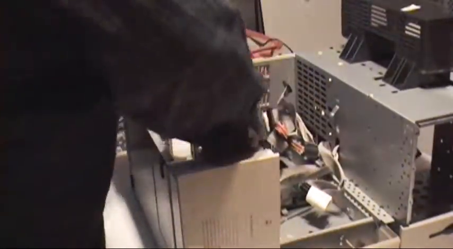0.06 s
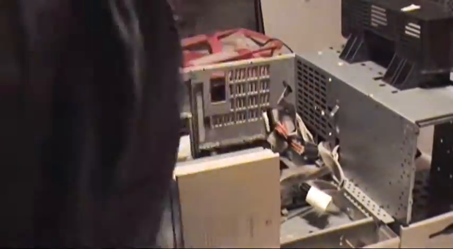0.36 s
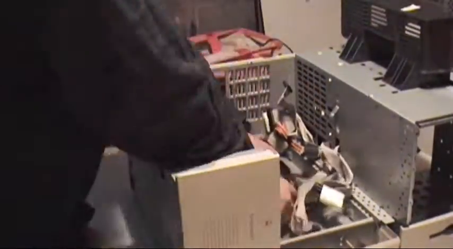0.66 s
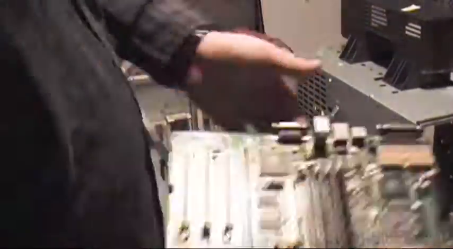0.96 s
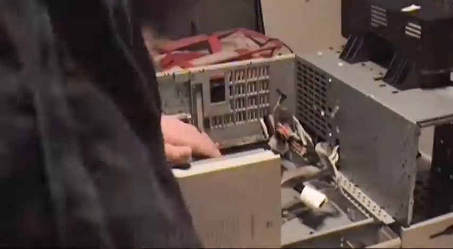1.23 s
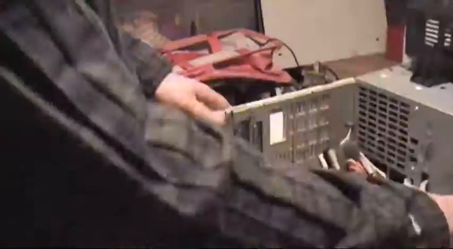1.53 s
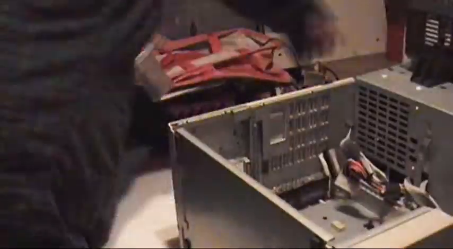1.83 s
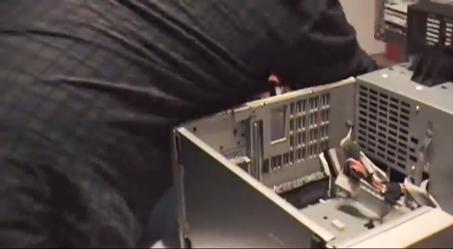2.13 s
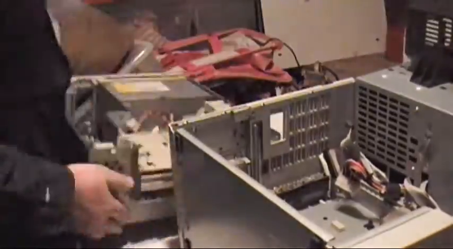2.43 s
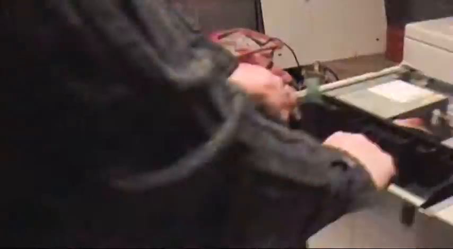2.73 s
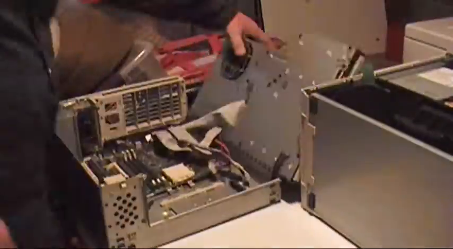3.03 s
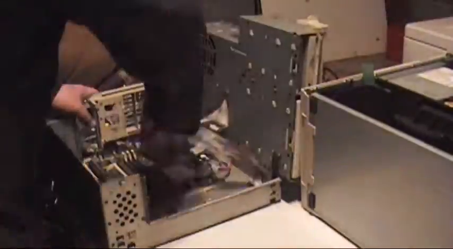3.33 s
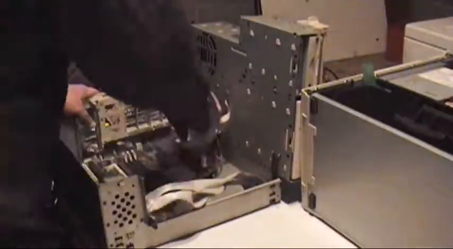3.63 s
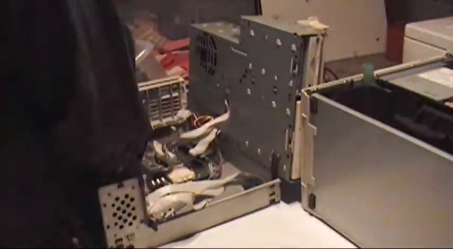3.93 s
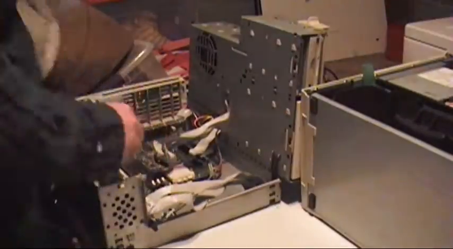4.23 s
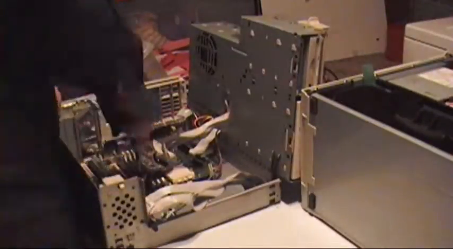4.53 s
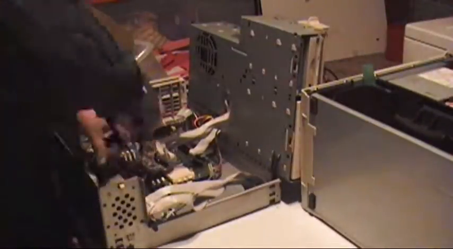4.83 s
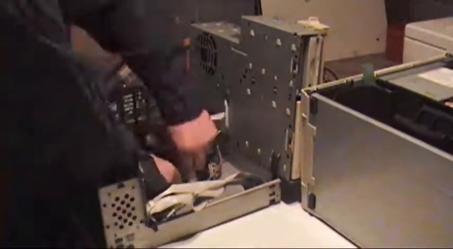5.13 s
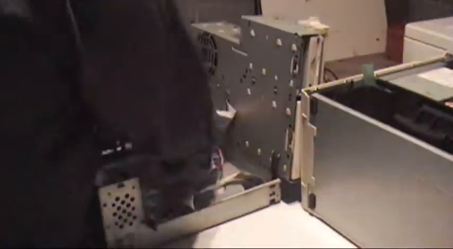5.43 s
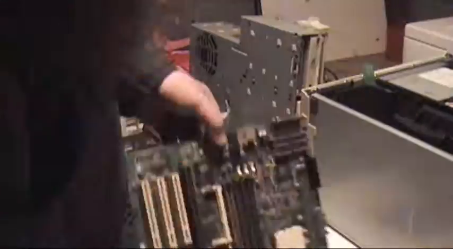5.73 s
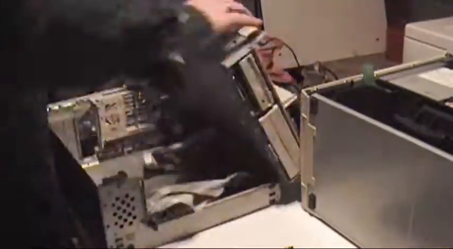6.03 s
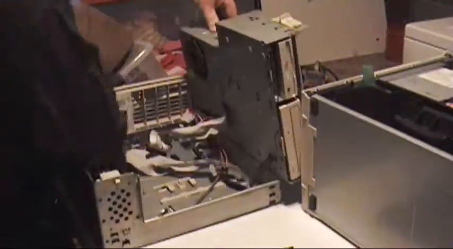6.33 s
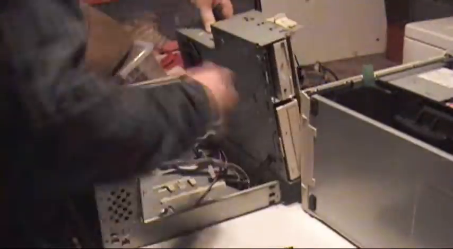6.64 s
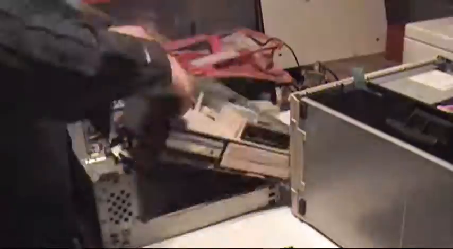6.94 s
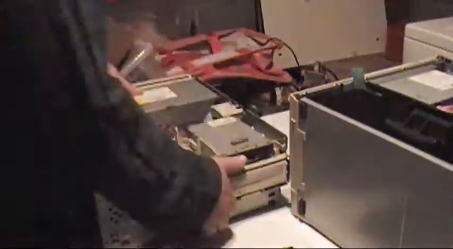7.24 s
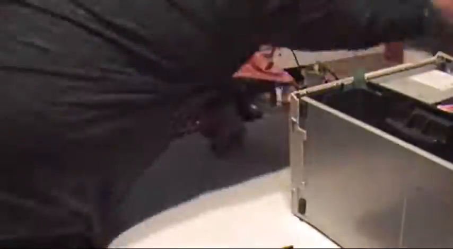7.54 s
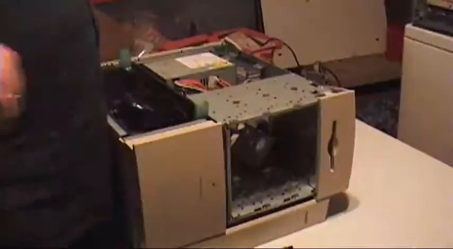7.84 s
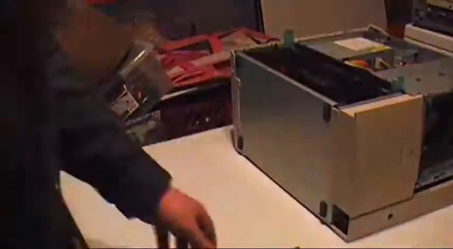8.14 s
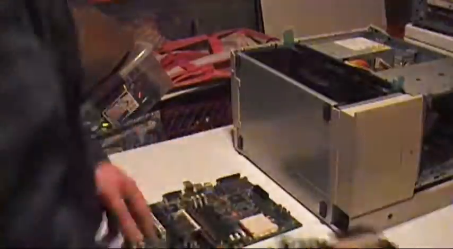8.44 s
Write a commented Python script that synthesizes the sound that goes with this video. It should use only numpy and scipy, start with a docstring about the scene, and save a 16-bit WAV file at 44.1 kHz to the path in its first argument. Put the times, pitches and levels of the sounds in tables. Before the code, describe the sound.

Fast-motion handling of thin metal parts in a small room, heard from directly in front. Sharp, irregular clicks and rattles run over crackling cable and sleeve rustle and light table knocks. Early on the steel computer case squeaks and scrapes, then its panel rings. Screws jingle softly, another squeak follows, and near the end come harder hits and a loud short scrape. A faint steady whine and hiss lie underneath.

```python
"""Taking a steel computer case apart

Sped-up (time-lapse) sound of work on a table in a small room; every sound is short and high. Screws,
clips and brackets click, parts slide and knock on the table. Shoved about, the case squeaks; blows ring
its side panel. Sleeves and cables rustle and loose screws jingle over room hiss and a faint whine."""
import sys
import numpy as np
from scipy import signal
from scipy.fft import rfft, irfft, next_fast_len
from scipy.io import wavfile
from scipy.ndimage import uniform_filter1d

SR = 44100
rng = np.random.default_rng(int(sys.argv[2]) if len(sys.argv) > 2 else 0)


def transcribe(signal):
    """Save signal, clipped to [-1, 1], as a 16-bit WAV file at the path in sys.argv[1]."""
    frames = np.atleast_2d(signal).T
    limited = np.clip(frames, -1, 1)
    pcm = np.round(limited * 32767).astype(np.int16)
    wavfile.write(sys.argv[1], SR, pcm)


N = 382347
TIME = np.arange(N) / SR
TOP_HZ = 15900

# metal contact spectrum: f/Hz, level/dB
CONTACT_SPECTRUM = [(120, -29.5), (400, -23.5), (800, -21), (1400, -10), (2400, -3), (3200, -4.5),
                    (5000, -0.5), (9000, 0), (15500, -5.5)]
# sleeve and cable spectrum: f/Hz, level/dB
RUSTLE_SPECTRUM = [(600, -16), (2300, 7), (3400, 0.5), (5500, 4), (10000, 3.5), (15500, -2.5)]


def undb(db):
    """Decibels to gain."""
    return 10 ** (np.asarray(db) / 20)


def rms(x):
    """Root mean square."""
    return np.sqrt(np.mean(x ** 2))


def unit(x):
    """Scale to rms 1."""
    return x / rms(x)


def fade(t, t60_s):
    """Free decay, 60 dB in t60_s."""
    return np.exp(-np.log(1000) * t / max(t60_s, 1e-3))


def arch(u):
    """Smooth swell: 1 at u = 0, zero beyond -1 and 1."""
    return np.cos(np.pi / 2 * np.clip(u, -1, 1)) ** 2


def walk(rate_hz):
    """Smooth random curve, rms 1."""
    step = int(SR / rate_hz)
    return unit(uniform_filter1d(np.repeat(rng.standard_normal(N // step + 1), step), step)[:N])


def add(track, start_s, x):
    """Mix x into the track."""
    i = max(int(start_s * SR), 0)
    track[i:i + len(x)] += x[:max(N - i, 0)]


def pan(x, left_db):
    """Mono to stereo, the left louder by left_db."""
    gains = undb(np.array([[left_db], [-left_db]]) / 2)
    return x * gains / gains.mean()


def colour(x, spectrum, tilt_db_oct=0):
    """Minimum-phase filter through (f/Hz, level/dB) points, tilted above 1400 Hz."""
    n = 2 * next_fast_len(len(x) // 2 + 1)
    hz, db = np.transpose(spectrum)
    tilted_db = db + tilt_db_oct * np.log2(np.maximum(hz / 1400, 1))
    bin_hz = np.arange(n // 2 + 1) * SR / n
    gain = undb(np.interp(np.log(bin_hz + 1), np.log(hz), tilted_db))
    cepstrum = irfft(np.log(gain))
    cepstrum[1:n // 2] *= 2
    cepstrum[n // 2 + 1:] = 0
    return irfft(rfft(x, n) * np.exp(rfft(cepstrum)))[:len(x)]


def resonate(x, hz, width_hz):
    """One resonance, gain 1 at its centre."""
    return signal.lfilter(*signal.iirpeak(hz, hz / width_hz, fs=SR), x)


def reflect(x, lag_s, gain):
    """A bounce off a nearby sheet ripples the spectrum; the lag may move."""
    i = np.arange(len(x))
    return x + gain * np.interp(i - lag_s * SR, i, x, left=0)


def room(x, tail_t60_s=0.056, tail_db=-22, early_t60_s=0.006, early_db=-17, size=5000):
    """A very short tail, and near reflections that differ between the sides."""
    # left-right difference of the reflections: f/Hz, level/dB
    spread = [(100, 9), (1000, -7), (3000, -25), (6000, -3.5), (12000, 4)]
    t = np.arange(size) / SR
    mid = np.atleast_2d(x).mean(axis=0)
    tail_noise, early_noise = rng.standard_normal((2, size)) * (t > 0.001) / np.sqrt(size)
    tail_ir = tail_noise * unit(fade(t, tail_t60_s))
    early_ir = colour(unit(early_noise * fade(t, early_t60_s)) / np.sqrt(size), spread)
    tail = undb(tail_db) * signal.oaconvolve(mid, tail_ir)[:N]
    early = undb(early_db) * signal.oaconvolve(mid, early_ir)[:N]
    return x + tail + early * np.array([[1], [-1]])


def air(shared_db=-63, own_db=-54):
    """Room noise common to both sides, plus a brighter hiss on each."""
    # room noise before tilt: f/Hz, level/dB
    spectrum = [(30, -22), (100, -20.5), (200, -17), (310, -8.5), (520, -11), (900, 0), (1500, -3),
                (2300, 2.5), (3200, 1), (6000, 0), (15500, -7)]
    shared = unit(colour(rng.standard_normal(N), spectrum, tilt_db_oct=-4.5))
    own = np.array([unit(colour(rng.standard_normal(N), spectrum, tilt_db_oct=2.2)) for _ in range(2)])
    return undb(shared_db) * shared + undb(own_db) * own


def whine(waver=0.001024, flutter_db=2):
    """Mains-powered gear: steady lines that waver a little."""
    # sine lines: f/Hz, rms level/dB
    lines = [(909.5, -64.5), (1856, -58), (2184, -67.5), (3711, -66.5)]
    out = np.zeros(N)
    wavering_s = np.cumsum(1 + waver * walk(25)) / SR
    for hz, db in lines:
        flutter = (walk(14) + walk(2.02)) / np.sqrt(2)
        out += undb(db + flutter_db * flutter) * np.sin(2 * np.pi * hz * wavering_s)
    return np.sqrt(2) * out


def whistle():
    """A faint far whistle swells and fades as it glides down."""
    # glides: start/s, length/s, from/Hz, to/Hz, top rms level/dB
    glides = [(.48, 0.11, 1345, 1296, -59), (0.976, 0.22, 1450, 1285, -65)]
    out = np.zeros(N)
    for start_s, length_s, from_hz, to_hz, db in glides:
        u = np.linspace(-1, 1, int(length_s * SR))
        cycles = np.cumsum(np.linspace(from_hz, to_hz, len(u))) / SR
        add(out, start_s, undb(db) * arch(u) * np.sin(2 * np.pi * cycles))
    return np.sqrt(2) * out


def jingles(patter_db=8, hiss_db=-4):
    """Loose screws tap each other in a dense patter and ring in a few high modes."""
    # shakes: centre/s, length/s, level/dB
    shakes = [(4.46, 0.55, -53.5), (4.744, 0.55, -48), (5.333, 1, -53)]
    # screw modes: f/Hz, width/Hz, level/dB
    modes = [(4840, 380, -2.5), (8400, 620, -2), (10800, 550, 2), (11750, 350, 4), (13000, 400, -6),
             (14000, 300, -2)]
    shake = sum(undb(db) * arch(2 * (TIME - at_s) / length_s) for at_s, length_s, db in shakes)
    taps = rng.standard_normal(N) * undb(patter_db * walk(360))
    ring = unit(sum(undb(db) * resonate(taps, hz, width_hz) for hz, width_hz, db in modes))
    return shake * (ring + undb(hiss_db) * unit(colour(taps, RUSTLE_SPECTRUM)))


def rustle(tick_t60_s=0.0094, tick_db=-2, cloth_db=-8, patchy_db=4.5, idle_db=-63,
           bounce=0.67, ticks=1900):
    """Cables and sleeves crackle and rub near the steel sheets; between reaches they almost rest."""
    # reaches of an arm: centre/s, length/s, level/dB
    reaches = [(0.032, 0.3, -41.5), (0.736, 0.2, -42), (1.228, 0.19, -45), (1.565, 0.078, -45),
               (1.915, 0.093, -42), (2.147, 0.17, -34.5), (2.368, 0.11, -36), (2.6, 0.52, -45.5),
               (2.858, 0.15, -42), (3.304, 0.11, -41), (3.425, 0.2, -44.5), (3.825, 0.74, -48.5),
               (4.46, 0.26, -46), (5.216, 0.2, -51), (5.66, 0.43, -61), (5.77, 0.35, -46),
               (6.106, 0.43, -43.5), (6.424, 0.23, -47), (6.58, 0.1, -46), (6.889, 0.13, -39),
               (7.051, 0.17, -40.5), (7.242, 0.13, -45.5), (7.46, 0.35, -39.5), (8.131, 0.1, -44),
               (8.356, 0.086, -43), (8.5, 0.13, -42.5), (8.644, 0.11, -46)]
    power = sum(undb(db) ** 2 * arch(2 * (TIME - at_s) / length_s) for at_s, length_s, db in reaches)
    motion = np.sqrt(power)
    energy = np.zeros(N)
    energy[rng.integers(N, size=ticks)] = undb(-5.5 * np.log(rng.random(ticks) + 0.02)) ** 2
    energy = np.abs(signal.oaconvolve(energy, fade(TIME[:2000], tick_t60_s) ** 2)[:N])
    crackle = unit(colour(rng.standard_normal(N) * np.sqrt(energy), RUSTLE_SPECTRUM))
    cloth = unit(colour(rng.standard_normal(N), RUSTLE_SPECTRUM) * undb(patchy_db * walk(50)))
    direct = undb(tick_db) * crackle * motion + cloth * np.hypot(undb(cloth_db) * motion, undb(idle_db))
    lag_s = 0.000581 * (1 + 0.205 * walk(20))
    return reflect(direct, lag_s, bounce) / np.hypot(1, bounce)


def table_knocks(mid_t60_s=0.02, push=9.9, mid_hz=260, ring_db=-4, size=4000, onset_samples=220):
    """A push and a dry shudder of the table top; each spot has its own pitch, damping and hardness."""
    # weight landing: t/s, onset level/dB
    landings = [(.272, -38), (0.281, -36.5), (.343, -34.5), (.677, -33.5), (.755, -38.5), (0.859, -42),
                (1.21, -33.5), (1.388, -36.5), (1.747, -34.5), (2.594, -39.5), (2.657, -36.5),
                (2.895, -35.5), (2.948, -34.5), (3.235, -40), (3.295, -36), (3.442, -35), (3.595, -36),
                (3.833, -38.5), (4.129, -36), (4.531, -38.5), (4.943, -35.5), (5.206, -37), (5.574, -37),
                (5.75, -34), (5.916, -36), (6.063, -36), (6.763, -36.5), (6.851, -38.5), (6.998, -36.5),
                (7.028, -36.5), (7.064, -38.5), (7.128, -38.5), (7.145, -36.5), (7.404, -38),
                (7.442, -45.5), (7.523, -38.5), (7.952, -39.5), (8.556, -47.5)]
    # table top response: f/Hz, level/dB
    spectrum = [(25, -21), (100, -2.5), (250, -0.5), (500, -4.5), (1200, -6), (4000, -6.5), (14000, -12)]
    out, t = np.zeros(N), np.arange(size) / SR
    spots = rng.uniform(-1, 1, (len(landings), 3))
    for (at_s, db), (pitch, damping, hardness) in zip(landings, spots):
        shudder = rng.standard_normal(size) * fade(t, mid_t60_s * 2 ** (damping / 2))
        force = colour(shudder, [(120, -10), (500, 0)])
        force[0] += push
        hz = mid_hz * 2 ** pitch
        knock = colour(force + undb(ring_db) * resonate(force, hz, hz / 2), spectrum, 2 * hardness - 1)
        add(out, at_s, knock * undb(db) / rms(knock[:onset_samples]))
    return out


def side_panel(ring_db=-10, rattle_db=3, wander=0.012, buzz_db=4, buzz_t60_s=0.19, size=30000):
    """The struck panel rings in its low modes; loose edges buzz and shake their pitch and level."""
    # blows: t/s, level/dB, tilt/(dB/oct)
    blows = [(1.957, -42.5, -0.5), (2.086, -43.5, 3), (2.176, -35.5, -2), (7.389, -39.5, 10),
             (7.406, -37, 1.5), (7.52, -34, 3)]
    # panel modes: f/Hz, level/dB, t60/s
    modes = [(344, -11, 0.2), (495, -1.5, 0.23), (844, -8, 0.44), (992, -3, 0.28), (1200, 0.5, 0.31),
             (1326, 0, 0.74), (1462, 3, 0.17), (1750, -3, 0.22), (2030, 1.5, 0.21)]
    buzz_spectrum = [(150, -26), (350, -24), (950, 6.5), (1400, -1)]  # f/Hz, level/dB
    out, t = np.zeros(N), np.arange(size) / SR
    for at_s, db, tilt in blows:
        ring = np.zeros(size)
        for hz, mode_db, t60_s in modes:
            cycles = hz * np.cumsum(1 + wander * walk(245)[:size]) / SR + rng.random()
            gain = undb(mode_db + tilt * np.log2(hz / 1000) + rattle_db * walk(105)[:size])
            ring += gain * np.sin(2 * np.pi * cycles) * fade(t, t60_s)
        buzz = unit(colour(rng.standard_normal(size), buzz_spectrum)) * fade(t, buzz_t60_s)
        add(out, at_s, undb(db) * (undb(ring_db) * ring + undb(buzz_db) * buzz))
    return out


def scrapes(grit_db=3, ring_db=-7, width_hz=1000, rise_db=20, fall_db=25, trim_db=-1):
    """Dense tiny slips shake a sliding part; the push swells, then lets go."""
    # slides: peak/s, rise/s, fall/s, level/dB, ring/Hz, tilt/(dB/oct)
    slides = [(1.01, 0.13, 0.12, -44.5, 6000, 0.5), (1.284, 0.026, 0.022, -26.5, 8040, 0),
              (1.311, 0.0051, 0.0058, -28, 2430, -1), (1.454, 0.022, 0.053, -25.5, 6300, -2),
              (1.645, 0.012, 0.084, -25, 10750, 0), (2.25, 0.01, 0.037, -38.5, 3700, -5.5),
              (2.705, 0.017, 0.059, -22.5, 2580, -1), (6.738, 0.018, 0.025, -32.5, 7300, 1),
              (6.817, 0.0053, 0.026, -36, 3050, -2.5), (6.844, 0.0081, 0.021, -20, 5270, 3),
              (7.698, 0.036, 0.099, -28.5, 5830, -1), (7.956, 0.024, 0.038, -15, 5500, -1),
              (8.001, 0.0073, .008, -35, 2040, -6)]
    out = np.zeros(N)
    for peak_s, rise_s, fall_s, db, hz, tilt in slides:
        t = np.arange(peak_s - rise_s, peak_s + fall_s, 1 / SR)
        slips = rng.standard_normal(N)[:len(t)]
        slips *= undb(grit_db * np.repeat(rng.standard_normal(N // 20), 20)[:len(t)])
        lag_s = 0.000935 * (1 + 0.13 * walk(31.7)[:len(t)])  # the gap to the sheet changes
        slips = reflect(slips, lag_s, gain=0.28)
        ring = resonate(resonate(slips, hz, 2 * width_hz), hz, width_hz)
        body = unit(colour(slips, CONTACT_SPECTRUM, tilt)) + undb(ring_db) * unit(ring)
        drop_db = np.where(t < peak_s, rise_db / rise_s ** 2, fall_db / fall_s ** 2) * (t - peak_s) ** 2
        add(out, t[0], unit(body) * undb(db + trim_db - drop_db))
    return out


def squeaks(jitter=0.06, octave_db=14, flutter_db=4, rasp_db=-3, braking_hz_per_s=350000, harmonics=7):
    """A foot of the case sticks and slips: smooth slip favours the octave, braking judders and rasps."""
    # jerks of the case: roughness 0-1, [(t/s, slip rate/Hz, level/dB), ...]
    jerks = [(0.28, [(.812, 1657, -48), (.824, 1692, -27), (.831, 1720, -33), (.838, 3150, -31),
             (.841, 3810, -14), (.847, 4710, -20), (.854, 4290, -15.5), (.859, 2923, -14),
             (.864, 1620, -25.5), (.875, 1360, -40)]), (0.24, [(1.398, 1925, -34), (1.408, 2300, -25),
             (1.415, 1950, -26.5), (1.426, 2660, -21.5), (1.431, 2300, -20), (1.435, 1410, -32)]),
             (0.83, [(1.436, 2520, -31), (1.445, 2520, -19.5), (1.466, 2400, -22.5), (1.469, 2400, -36)]),
             (0.2, [(5.533, 3350, -36), (5.537, 2980, -25), (5.542, 1916, -27), (5.548, 1675, -28),
             (5.558, 2086, -20), (5.57, 2183, -30.5), (5.573, 3020, -16), (5.581, 5360, -16.5),
             (5.588, 4860, -14.5), (5.594, 1850, -23), (5.601, 1120, -34)])]
    # resonances of the steel: f/Hz, level/dB
    steel = [(1200, -1), (2400, 3.5), (4300, -1.5), (6300, 8), (10300, 4), (12500, -1), (16000, -5)]
    out = np.zeros(N)
    friction = rng.standard_normal(N) * undb(flutter_db * walk(1500))
    rasp = undb(rasp_db) * unit(colour(friction, CONTACT_SPECTRUM, tilt_db_oct=3.1))
    wobble = walk(900)
    flutter = np.array([walk(350) for _ in range(harmonics)])
    for base_roughness, curve in jerks:
        times_s, rates_hz, levels_db = np.transpose(curve)
        t = np.arange(times_s.min(), times_s.max(), 1 / SR)
        i = (t * SR).astype(int)
        slip_hz = uniform_filter1d(np.interp(t, times_s, rates_hz), size=130)
        braking = np.maximum(-np.gradient(slip_hz) * SR / braking_hz_per_s, 0)
        roughness = np.clip(base_roughness + braking, 0, 1)
        partial_hz = np.arange(1, harmonics + 1)[:, None] * slip_hz * (1 + jitter * roughness * wobble[i])
        steel_db = np.interp(partial_hz, *np.transpose(steel))
        gains = undb(steel_db + flutter_db * flutter[:, i]) * (partial_hz < TOP_HZ)
        gains[1] *= undb(octave_db * (1 - roughness))
        partials = gains * np.sin(2 * np.pi * np.cumsum(partial_hz, axis=1) / SR)
        tone = partials.sum(axis=0) / np.sqrt((gains ** 2).sum(axis=0) / 2)
        squeak = np.sqrt(1 - roughness / 2) * tone + np.sqrt(roughness) * rasp[i]
        add(out, t[0], squeak * undb(np.interp(t, times_s, levels_db)))
    return out


def clicks(ring_db=-8.5, width_hz=800, overtone=0.77, seat_s=0.0001, chatter_db=2.5,
           lead_in_db=-21, lead_in_t60_s=0.0089, trim_db=-1, size=6000, onset_samples=220):
    """A part strikes and chatters; a crowd of short modes surrounds its main ring and overtone."""
    # small metal parts touching: t/s, level/dB, ring/Hz, tilt/(dB/oct), t60/s
    contacts = [(0.1076, -26, 5500, 4, 0.018), (0.128, -26, 5100, -3, 0.0035),
                (.1993, -34, 2380, 0.5, 0.034), (0.273, -23.5, 9000, 1.5, 0.01),
                (.28, -16, 5960, -1, 0.023), (0.3332, -22, 5800, 8.5, 0.011), (.3424, -30, 9150, 6, 0.068),
                (.377, -36, 3480, -2, 0.057), (0.4908, -26, 9050, 4.5, 0.032),
                (0.5146, -32, 3850, 2, 0.008), (.6766, -20.5, 11200, 1, 0.066),
                (.688, -24.5, 2530, -0.5, 0.045), (0.7548, -20, 7200, 5.5, 0.023),
                (1.204, -27, 7300, -2.5, 0.04), (1.362, -24, 12300, 0.5, 0.019),
                (1.3765, -22, 2720, 0, 0.017), (1.388, -18, 3940, -0.5, 0.0061),
                (1.7465, -17.5, 10800, 8.5, 0.017), (1.812, -33.5, 8500, 5, 0.048),
                (1.957, -25.5, 10400, 3.5, 0.025), (2.0848, -29, 10900, 0, 0.035),
                (2.1207, -24.5, 6960, 1, 0.044), (2.1747, -20, 11000, -1.5, 0.068),
                (2.3271, -27, 2500, -3, 0.019), (2.362, -18, 2620, -3, 0.013),
                (2.4337, -27, 5530, -5, 0.014), (2.452, -33.5, 5560, -3.5, 0.01),
                (2.592, -25.5, 10900, 6, 0.035), (2.649, -34, 4930, 4, 0.089),
                (2.6661, -18.5, 7900, -1, 0.019), (2.7413, -24.5, 8850, -2, 0.015),
                (2.8645, -35.5, 2400, -8, 0.0096), (2.9466, -24, 12300, 6.5, 0.089),
                (3.0314, -27.5, 14600, 1, 0.0051), (3.0478, -29, 11500, 1, 0.11),
                (3.0911, -30, 4730, 1, 0.0078), (3.3085, -27.5, 11900, 11, 0.049),
                (3.4426, -29, 3730, 2, .013), (3.509, -34.5, 8000, 4.5, 0.02),
                (3.5926, -18, 7900, 0.5, 0.038), (3.6358, -29, 8950, 8, 0.016),
                (3.834, -33.5, 9100, 4, .019), (3.8716, -34.5, 5040, 0, 0.025),
                (4.0995, -33, 9100, 2.5, 0.038), (4.1155, -29, 10500, 5, 0.0078),
                (4.1235, -21.5, 10800, 14.5, 0.0097), (4.371, -32, 12800, 1.5, 0.016),
                (4.3924, -23, 11500, 1.5, 0.003), (4.4319, -31, 10700, -0.5, 0.014),
                (4.467, -33, 9000, 0, 0.019), (4.4903, -24.5, 4800, 6, 0.02),
                (4.5312, -25.5, 8650, 0.5, .036), (4.779, -38, 9100, -2, 0.0071),
                (4.902, -21.5, 11400, 4, 0.01), (4.912, -23.5, 5800, 0, 0.033),
                (4.938, -24, 13900, 5, 0.053), (5.083, -29, 11900, 11, 0.019),
                (5.094, -31, 8450, 0.5, 0.022), (5.15, -34.5, 6500, -2, 0.051),
                (5.2256, -20.5, 6540, 2, 0.038), (5.27, -30, 9300, 13, 0.017),
                (5.743, -29.5, 2530, 0, 0.036), (5.7511, -18, 6400, 3.5, 0.023),
                (5.8203, -29, 6300, -1, 0.016), (5.8911, -25.5, 8300, -1.5, 0.01),
                (5.9031, -22.5, 6800, -3, 0.033), (5.9163, -17.5, 2790, 2.5, 0.027),
                (6.0641, -23.5, 5170, 3.5, 0.024), (6.1065, -26, 1980, -2.5, 0.015),
                (6.209, -33.5, 2500, -1.5, 0.085), (6.294, -33, 7540, 2, 0.05),
                (6.548, -34, 8700, 1.5, 0.034), (6.7622, -18, 10400, 8, 0.018),
                (6.8512, -16.5, 2970, 2, 0.0084), (6.9042, -25, 1900, -3, 0.017),
                (7.0276, -30, 7700, 4, 0.009), (7.0645, -18, 2300, 1, 0.063),
                (7.1247, -31, 8600, 8.5, 0.078), (7.196, -34.5, 4970, -3, .025),
                (7.3202, -31.5, 3920, -2, 0.026), (7.389, -15, 6800, 1, 0.047),
                (7.4047, -15.5, 3970, -1, 0.074), (7.4415, -18.5, 7250, 5, 0.013),
                (7.5193, -21.5, 4000, 1, 0.068), (7.6787, -23.5, 10400, 6, 0.25),
                (7.734, -24, 7400, -2.5, 0.1), (7.7774, -29, 7800, 0, 0.015),
                (8.2603, -24.5, 7040, -2.5, 0.026), (8.5559, -18, 2120, -1.5, 0.014)]
    # cable dragged over slots: start/s, end/s, gap/s, level/dB, ring/Hz, tilt/(dB/oct), t60/s
    drag = (.02, .1, .0122, -30.5, 9500, 2.5, .024)
    start_s, end_s, gap_s, *slot = drag
    slot_ticks = [(at_s, *slot) for at_s in np.arange(start_s, end_s, gap_s)]
    onset = size // 8
    out, t = np.zeros(N), (np.arange(size) - onset) / SR
    for at_s, db, hz, tilt, t60_s in [*contacts, *slot_ticks]:
        chatter = undb(chatter_db * np.repeat(rng.standard_normal(size), 20)[:size])
        lead_in = undb(lead_in_db) * fade(abs(t), lead_in_t60_s)  # faint noise swells into the click
        strike = fade(abs(t), t60_s) * (1 - np.exp(-abs(t) / seat_s) / 2)
        force = rng.standard_normal(size) * chatter * np.where(t < 0, lead_in, strike)
        bounced = reflect(force, lag_s=rng.uniform(0.000611, 0.0029), gain=0.71)
        crowd = colour(bounced, CONTACT_SPECTRUM, tilt)
        upper_hz = min(hz * rng.uniform(1.64, 2.1), TOP_HZ)  # a bent part's overtone is inharmonic
        modes = resonate(force, hz, width_hz) + overtone * resonate(force, upper_hz, width_hz)
        ring = resonate(modes, hz, width_hz=hz)
        hit = unit(crowd) + undb(ring_db) * unit(ring)
        add(out, at_s + t[0], hit * undb(db + trim_db) / rms(hit[onset:onset + onset_samples]))
    return out


def chassis(x, width_hz=55, ring_db=-1):
    """The direct sound plus the ringing it stirs in the steel chassis."""
    # chassis modes: f/Hz, level/dB
    modes = [(2460, -1), (2730, -7.5), (4066, -3.5), (4640, -7), (4915, 3), (5293, -0.5), (5637, -26),
             (6673, -10), (7500, -12)]
    return x + undb(ring_db) * sum(undb(db) * resonate(x, hz, width_hz) for hz, db in modes)


def scene():
    """The work is straight ahead; the table's knocks lean left."""
    metal = chassis(clicks() + scrapes() + rustle()) + squeaks() + jingles()
    knocks = room(pan(table_knocks(), left_db=17), early_db=-27)
    return room(metal) + side_panel() + knocks + whine() + whistle() + air()


def record(dry):
    """The microphone's band ends steeply at TOP_HZ."""
    return signal.sosfilt(signal.ellip(10, 0.2, 70, TOP_HZ, fs=SR, output="sos"), dry)


dry = scene()
out = record(dry)
transcribe(out)
```